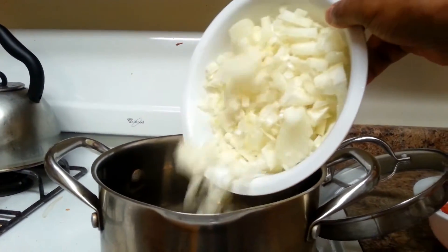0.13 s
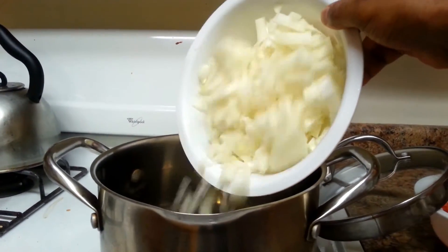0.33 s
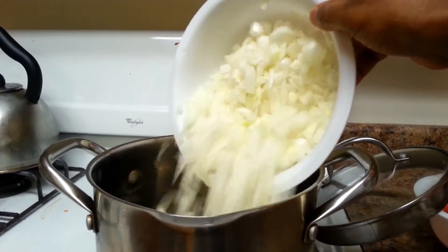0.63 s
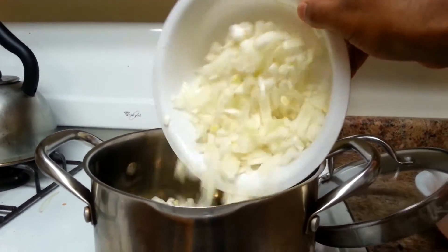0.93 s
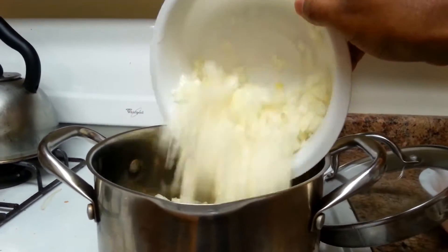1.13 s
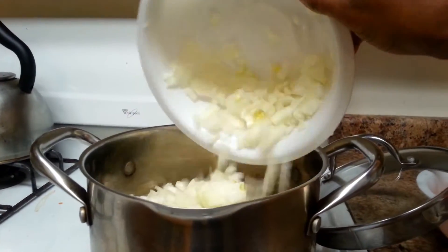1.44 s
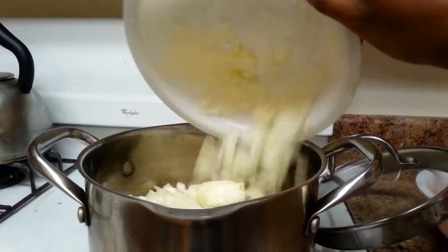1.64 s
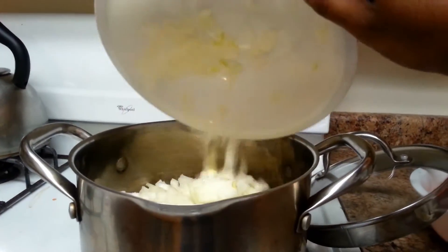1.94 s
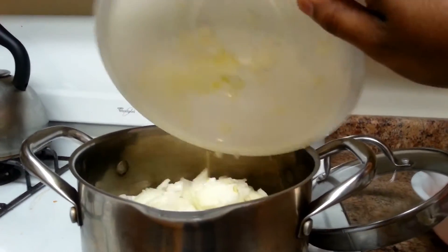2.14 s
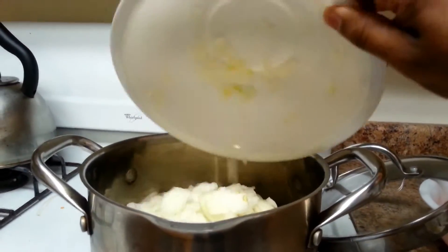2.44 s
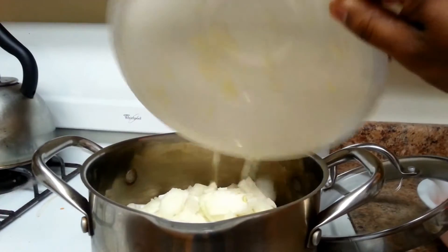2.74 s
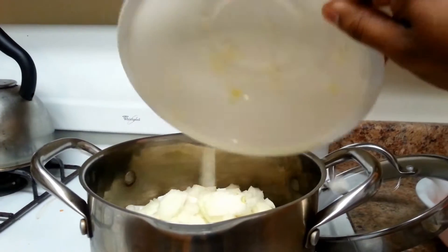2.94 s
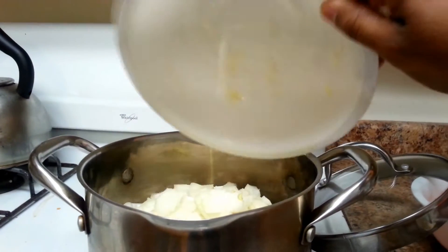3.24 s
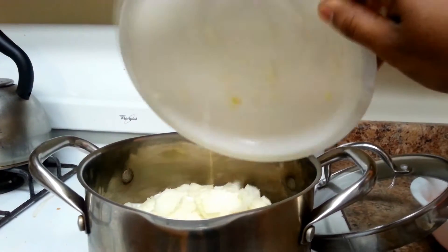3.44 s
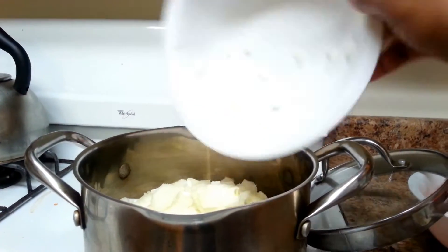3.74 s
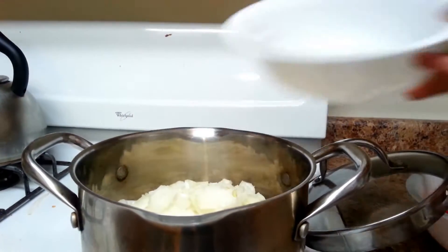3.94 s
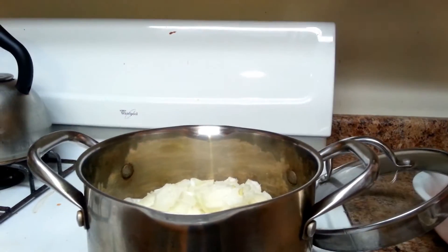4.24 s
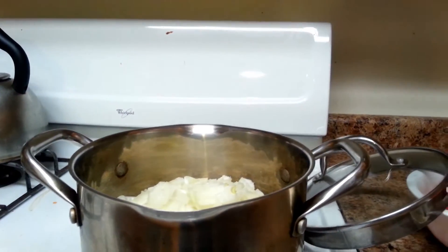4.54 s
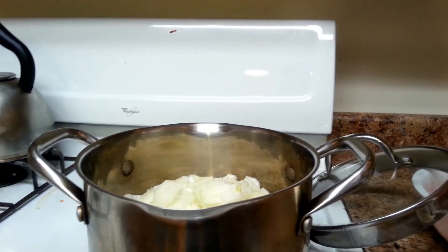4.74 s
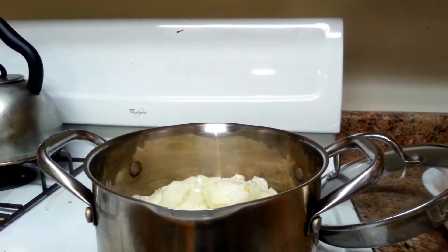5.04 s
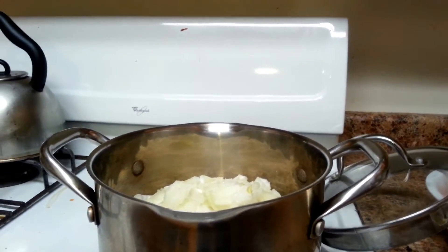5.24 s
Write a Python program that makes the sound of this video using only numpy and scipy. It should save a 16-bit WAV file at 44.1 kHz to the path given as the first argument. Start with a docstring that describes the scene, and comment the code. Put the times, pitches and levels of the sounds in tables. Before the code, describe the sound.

Close in a small, hard-walled kitchen with a steady fan rush, chopped onion drops into a steel pot: damped pats, faint metallic ringing and wet patter, then two soft heaps. The emptied bowl knocks the rim, two weak clinks followed by seven loud, quick ones. After a pause with only the fan, the bowl thumps onto a counter and is nudged.

```python
"""A kitchen stove: chopped onion slides from a bowl into a steel pot; pieces ring the bottom and heaps flop down.
The emptied bowl is knocked against the pot in a run of sharp clinks, then set down on the counter and nudged.
Blows excite decaying modes and noise bursts; sliding food and slips are swarms of tiny random contacts.
A small hard kitchen answers every blow with a dense tail, over the steady rush of a fan made of shaped noise."""
import sys
import numpy as np
from scipy import signal
from scipy.fft import rfft, irfft
from scipy.io import wavfile

SR = 44100
rng = np.random.default_rng(int(sys.argv[2]) if len(sys.argv) > 2 else 0)


def store_wav(level_fs):
    """Save 16-bit WAV to argv[1]."""
    pcm = np.round(np.clip(np.atleast_2d(level_fs), -1, 1) * 32767)
    wavfile.write(sys.argv[1], SR, pcm.T.astype(np.int16))


N = 236891
T = np.arange(N) / SR  # time, s
HZ = np.maximum(np.arange(N + 1) * SR / (2 * N), 1)  # frequencies of a spectrum of 2 N samples


def undb(db):
    """Level to amplitude: 20 dB is a factor of ten."""
    return 10 ** (np.asarray(db) / 20)


def unit(x):
    """Normalization of mean power: scale to rms 1."""
    return x / np.sqrt(np.mean(x ** 2))


def along(points, hz=HZ, axis=1):
    """Interpolation on a log-frequency axis, which follows musical intervals."""
    rows = np.array(points, float)
    return np.interp(np.log(hz), np.log(rows[:, 0]), rows[:, axis])


def pan(db):
    """Interaural level difference: left and right gains, db apart."""
    return undb(np.array([[db], [-db]]) / 2)


def convolve(x, response):
    """Linear superposition: every sample of x starts its own copy of the response."""
    return signal.fftconvolve(np.atleast_2d(x), np.atleast_2d(response), axes=1)[:, :x.shape[-1]]


def colour(x, points, size=2048):
    """Minimum-phase filtering: a causal response of unit energy whose shape follows (pitch_hz, level_db) points."""
    hz = np.maximum(np.arange(size // 2 + 1) * SR / size, 1)
    cepstrum = irfft(np.log(undb(along(points, hz))))
    # folding the cepstrum onto positive times makes the response causal
    cepstrum[1:size // 2] *= 2
    cepstrum[size // 2 + 1:] = 0
    response = irfft(np.exp(rfft(cepstrum)))
    return convolve(x, response / np.linalg.norm(response))


def fade(t60, t):
    """Exponential decay: 60 dB lost in t60 seconds."""
    return np.exp(-np.log(1000) * t / t60)


def swells(rows):
    """Smooth pushes: a sum of Gaussian gains from (peak_s, level_db, half_s) rows."""
    return sum(undb(db) * np.exp(-.5 * ((T - s) / half) ** 2) for s, db, half in rows)


def add(out, s, x):
    """Superposition in time: mix x into out from second s."""
    i = max(int(s * SR), 0)
    out[..., i:i + x.shape[-1]] += x[..., :N - i]


def ring(modes):
    """Modal synthesis: damped sines answer one sharp blow; successive rows swing in opposite directions."""
    t = T[:SR // 2]
    total = 0
    for k, (hz, t60, db, side) in enumerate(modes):
        swing = fade(t60, t) * np.sin(2 * np.pi * hz * t)
        total = total + (-1) ** k * undb(db) * pan(side) * swing
    return total


def vary(modes, spread_db, detune):
    """Modal excitation: each blow meets a slightly different spot and load, which shifts pitch and level."""
    chance = rng.standard_normal((len(modes), 2))
    return [(hz * (1 + detune * a), t60, db + spread_db * b, side)
            for (hz, t60, db, side), (a, b) in zip(modes, chance)]


def crack(points, t60):
    """High modal density: countless short modes merge into a decaying, nearly flat burst, then coloured."""
    shape = fade(t60, T[:SR // 2])
    burst = rng.standard_normal((2, len(shape))) * shape
    for _ in range(2):
        flat = irfft(np.exp(1j * np.angle(rfft(burst))))
        burst = flat * np.sqrt(shape)
    return colour(burst / np.linalg.norm(burst, axis=1, keepdims=True), points)


def grains(rate, spread_db):
    """Shot noise: tiny random contacts, rate a second, with exponentially distributed levels."""
    sizes = undb(spread_db * np.minimum(rng.exponential(size=N), 4))
    return unit((rng.random(N) < rate / SR) * sizes * rng.standard_normal((2, N)))


def diffuse(hz):
    """Diffuse-field coherence: random-phase stereo spectrum, most alike in the bass, unrelated in the treble."""
    # left-right correlation of diffuse sound: pitch_hz, correlation
    correlation = [(30, 0), (80, 1), (300, 0.91), (600, 0.74), (1200, 0), (3000, 0), (14000, 0)]
    likeness = np.clip(along(correlation, hz), 0, .99)
    mid, side = np.exp(2j * np.pi * rng.random((2, len(hz))))
    return mid * np.sqrt(1 + likeness) + side * np.sqrt(1 - likeness) * np.array([[1], [-1]])


def knocks():
    """Impact excitation: a sub-millisecond push wakes bowl and pot; nearly equal spots give related clinks."""
    # bowl against pot: start_s, strength_db, contact_ms (60 dB decay of the push), rim_db (before the rim lift)
    blows = [(1.4774, -21, .16, 3.5), (2.171, -15, 0.25, -5), (2.4388, -3, 0.12, -3.5),
             (2.5994, -1, 0.15, -6), (2.7762, -2, 0.15, -3.5), (2.9374, 0.5, .19, -6),
             (3.1000, 2.5, .2, -8), (3.26, 3.5, 0.19, -4), (3.4558, 3.5, 0.17, -5.5)]
    # bowl and pot rim struck together: pitch_hz, t60_s, level_db, left_minus_right_db
    clink = [(254, 0.041, -35, 2), (636, 0.097, -27.5, 6), (881, 0.076, -17, -9), (974, 0.04, -9.5, 4),
             (1055, 0.044, -17.5, -11), (1246, 0.12, -21, -15), (1323, 0.051, -21, 23),
             (1728, 0.016, -8, 7.5), (1623, 0.028, -28.5, 4), (1693, 0.019, -22.5, -6),
             (2034, 0.11, -23.5, -9), (2170, 0.0088, -24.5, -40), (2386, 0.018, -15.5, 18.5),
             (3160, 0.0057, -5.5, 4), (3590, 0.026, -25.5, 24), (3754, 0.018, -18.5, -12),
             (4190, 0.047, -31, 12), (4595, 0.018, -21, -7), (5380, 0.011, -20, -13),
             (6000, 0.011, -34.5, -22), (7600, 0.036, -42, -3), (7240, 0.044, -28.5, -9),
             (8320, 0.036, -40, -30), (8980, 0.032, -22, -10), (8840, 0.016, -29, -2),
             (10700, 0.0095, -26, -20)]
    # spectrum of the crack: pitch_hz, level_db
    crack_bands = [(60, -34.5), (200, -9), (330, -13.5), (520, -27.5), (740, -6.5), (960, 2), (1150, -2),
                   (1400, -11.5), (1700, -4), (2000, -9), (2600, -7), (4400, -8.5), (5900, -16),
                   (8000, -12), (10000, -14), (14500, -21.5)]
    # spectrum of the rim tick: pitch_hz, level_db
    rim = [(700, 12), (1800, -22.5), (3300, -9), (4400, 13), (6000, -16.5), (9000, -44), (12000, -36)]
    clink_db, crack_db, rim_lift_db = 1, 15.5, 11
    out, same = np.zeros((2, N)), crack(crack_bands, t60=0.048)
    for s, db, contact_ms, rim_db in blows:
        modes = vary(clink, spread_db=1.3, detune=.006)
        snap = pan(-1.6) * (same + crack(crack_bands, t60=0.1)) / np.sqrt(2)
        tick = undb(rim_db + rim_lift_db) * crack(rim, t60=0.019)
        blow = undb(clink_db) * ring(modes) + undb(crack_db) * snap + tick
        push = fade(contact_ms / 1000, T[:SR // 200])
        add(out, s, undb(db) * convolve(blow, push / push.sum()))  # a longer push sounds duller
    return out


def pieces():
    """Soft impact: a piece lands with a damped pat and leaves the bottom ringing, differently at each spot."""
    # the largest single onion pieces: start_s, pat_db, pat_hz
    landings = [(.0405, -14.5, 546), (.0613, -9.5, 652), (.096, -13, 2000), (.1300, -7.5, 974),
                (0.1331, -13, 3920), (.179, -14, 960), (0.217, -22.5, 2720), (.234, -21.5, 3000),
                (.309, -12, 550), (.375, -17, 630), (.4030, -8, 1310), (.4040, -17, 2550),
                (.421, -11.5, 1200), (.4290, -13, 2660), (.487, -23, 1260), (0.5236, -15, 1290),
                (.613, -28, 1540), (0.8464, -17.5, 1210), (0.879, -20, 1610), (1.224, -38, 2760)]
    # pot bottom: pitch_hz, t60_s, level_db, left_minus_right_db
    bottom_modes = [(573, 0.15, -9.5, 3), (940, 0.3, -10, -17), (1030, 0.42, -8.5, 15),
                    (1227, 0.13, -5.5, 2), (2008, 0.35, -10, -9), (2046, 0.25, -11, 6),
                    (2120, 0.18, -17, 11), (3250, 0.3, -18.5, -5), (3500, 0.21, -34, -4),
                    (3768, 0.17, -22, -7), (4500, 0.12, -29, -5), (4420, 0.23, -25, -3),
                    (4980, 0.18, -26, -6), (5900, 0.093, -38, -9)]
    pat_s, shortening = 0.0046, .35  # pat length at 1 kHz; power by which higher pats are shorter
    smack_db, smack_t60_s = 6.5, 0.079
    # bottom ring; softer pieces hardly wake it; the growing pile damps it
    ring_db, soft_hz, cover_db_per_s = -19.5, 920, 23.5
    bits_db, bits_fall_s = -9, 0.12  # crumbs scattering after a piece; time to fall to 1/e
    out, scatter, t = np.zeros((2, N)), np.zeros(N), T[:SR // 20]
    for s, db, hz in landings:
        age = 3 * t / (pat_s / (hz / 1000) ** shortening)
        add(out, s, undb(db) * age ** 2 * np.exp(-1.6 * age) * np.sin(2 * np.pi * hz * t))
        # the softer the piece, the lower its pat and the duller and weaker its smack
        smack_bands = [(hz / 3, -14), (hz, 0), (hz * 1.5, -11), (hz * 4.7, -36), (hz * 9, -70)]
        smack = crack(smack_bands, t60=smack_t60_s)
        add(out, s, undb(db + smack_db) * min(hz / 1800, 1) * smack)
        wake = undb(db + ring_db - cover_db_per_s * s) / (1 + (soft_hz / hz) ** 4)
        modes = vary(bottom_modes, spread_db=2.5, detune=.008)
        add(out, s, wake * ring(modes))
        add(scatter, s, wake * np.exp(-T / bits_fall_s))
    # many tiny bits keep the bottom shimmering, each with a short ring
    bottom = ring(bottom_modes) * fade(0.099, T[:SR // 2])
    bits = grains(rate=300, spread_db=3)
    return out + undb(bits_db) * convolve(scatter * bits[0], bottom / np.linalg.norm(bottom[0]))


def onion():
    """Granular flow: wet dice patter and tick as they slide; a heap lands with a thud and a dying splatter."""
    # heaps of onion landing: start_s, thud_db, splatter_db, fall_s (time to fall to 1/e)
    heaps = [(0.634, -30, -27.5, 0.038), (0.92, -26.5, -31.5, 0.032)]
    # onion sliding out of the bowl in surges: peak_s, level_db, half_s (Gaussian half length)
    surges = [(.23, -45, 0.035), (.535, -38.5, 0.012), (.63, -38, 0.024), (.725, -39.5, 0.029),
              (.90, -41, 0.037), (1.2, -46.5, 0.038), (1.32, -52, .07), (1.69, -51, .04)]
    # spectrum of a heap's thud: pitch_hz, level_db
    thud_bands = [(35, -63), (60, -29), (163, 0), (234, -1), (314, 1.5), (434, -11), (775, -2.5),
                  (911, -24), (1500, -45), (1950, -34), (3300, -120)]
    # spectrum of the wet patter: pitch_hz, level_db
    wet = [(240, -18.5), (400, -9.5), (1020, -6.5), (1160, -7.5), (1690, -15), (1880, -11.5), (4460, -18.5),
           (6040, -26), (13900, -31.5), (15000, -53)]
    # spectrum of crisp ticks of stray dice: pitch_hz, level_db
    tick_bands = [(500, -13), (1200, 0.5), (2000, -4.5), (2800, -2), (4200, -8.5), (6000, -21),
                  (14000, -32)]
    # thin patter between the surges, until the bowl runs empty
    trickle_db, trickle_end_s, trickle_fall_s = -49.5, 0.92, 0.33
    tick_db, ticks_per_s = -9.5, 180  # level relative to the patter
    trickle = undb(trickle_db) * np.exp(-np.maximum(T - trickle_end_s, 0) / trickle_fall_s)
    thud, splatter = np.zeros(N), trickle + swells(surges)
    for s, thud_db, splatter_db, fall in heaps:
        landing = (1 - fade(0.0049, T)) * np.exp(-T / fall)
        add(thud, s, undb(thud_db) * landing)
        add(splatter, s, undb(splatter_db) * landing)
    patter = colour(splatter * grains(rate=2500, spread_db=-0.5), wet)
    ticks = undb(tick_db) * colour(splatter * grains(rate=ticks_per_s, spread_db=1), tick_bands)
    thuds = colour(thud * grains(rate=3300, spread_db=6.0)[0], thud_bands)
    return thuds + pan(-0.45) * patter + ticks


def brush(s=1.785, db=-45):
    """Friction noise: a brief light scrape of dense contacts as the last pieces leave the bowl."""
    swell = np.exp(-.5 * ((T - s) / .016) ** 2)
    contacts = grains(rate=3000, spread_db=1.5)
    # pitch_hz, level_db
    scrape = [(2200, -19), (2800, -3), (3600, -8), (5500, -7), (6800, -10), (8500, -21), (12000, -38)]
    return undb(db) * colour(swell * contacts, scrape)


def counter():
    """Impact and friction: the bowl thumps down with an early echo, bumps again and is nudged in small slips."""
    # bowl set down, its early echo at 4.9234 s, and later bumps on the counter: start_s, level_db
    setdown = [(4.9098, 2), (4.9234, -10), (4.9673, -6), (5.1970, -11.5), (5.2300, -9.5)]
    # bowl standing on the counter: pitch_hz, t60_s, level_db, left_minus_right_db
    bowl_modes = [(122, .15, -56, 8), (203.6, 0.19, -37.5, 7), (459, 0.084, -34.5, 2),
                  (680, 0.024, -31.5, 7), (925, 0.051, -24.5, -11), (1630, 0.069, -26.5, 14),
                  (2177, 0.026, -23, 14), (2440, 0.023, -20, 6), (3420, 0.0088, -32.5, 18)]
    # spectrum of bowl base against counter: pitch_hz, level_db
    scuff = [(40, -33), (75, 4), (115, 3), (200, -4.5), (350, -13), (450, -26), (740, -10.5), (920, -4.5),
             (1220, -6.5), (1650, -4.5), (2400, -8), (4500, -23.5), (7000, -40), (12000, -55)]
    # low thump of the counter top under the bowl: pitch_hz, level_db
    thump = [(30, -29), (60, -9), (110, -0.5), (150, -7), (250, -27), (600, -62)]
    # bowl base pushed along the counter: peak_s, level_db, half_s (Gaussian half length)
    nudges = [(4.99, -34, 0.021), (5.2, -33.5, 0.022), (5.255, -33, 0.021)]
    scuff_db, thump_db, thump_t60_s = 3.5, -5, 0.11
    blows = np.zeros(N)
    for s, db in setdown:
        add(blows, s, undb([db]))
    body = ring(bowl_modes) + undb(scuff_db) * crack(scuff, t60=0.043)
    body = body + undb(thump_db) * crack(thump, t60=thump_t60_s)[0]
    slips = swells(nudges) * grains(rate=500, spread_db=2.5)
    return convolve(blows, body) + colour(slips, scuff)


def ports(x, hz=450):
    """Radiation and spacing: small objects hardly radiate long waves, which reach both microphone ports alike."""
    low_cut_hz = 98
    x = signal.sosfilt(signal.butter(3, low_cut_hz, "high", fs=SR, output="sos"), x)
    mid, side = (x[0] + x[1]) / 2, (x[0] - x[1]) / 2
    # the left-right difference shrinks towards a fifth in the bass
    spectrum = rfft(side, 2 * N) * np.sqrt((HZ ** 2 + (hz / 5) ** 2) / (HZ ** 2 + hz ** 2))
    return mid + irfft(spectrum)[:N] * np.array([[1], [-1]])


def kitchen(x, first_s=0.00465, build_s=0.004, db=-2, ceiling_s=0.016, ceiling=0.44):
    """Reverberation: stove back and walls return a dense tail, swelled by the ceiling; the lows linger longest."""
    # kitchen bands: pitch_hz, t60_s, level_db
    bands = [(103, 0.59, 1), (294, 0.68, 7.5), (653, 0.68, 9), (892, 0.36, -1), (2000, 0.39, -1.5),
             (3800, 0.36, 0), (8000, 0.25, 1.5), (14200, .24, -11)]
    t, hz = T[:SR], np.maximum(np.arange(SR // 2 + 1), 1)
    noise, tail = diffuse(hz), 0
    centres = np.log(np.array(bands)[:, 0])
    build_up = 1 - fade(build_s, np.maximum(t - first_s, 0))
    arrival = build_up * (1 + ceiling * np.exp(-((t - ceiling_s) / 0.016) ** 2))
    for (_, t60, band_db), share in zip(bands, np.eye(len(bands))):
        band = irfft(noise * np.interp(np.log(hz), centres, share))  # overlapping triangular bands
        tail = tail + undb(band_db) * unit(arrival * fade(t60, t)) * band / np.sqrt(2)
    return undb(db) * convolve(x, tail)


def fan():
    """Flow noise and duct resonance: a steady broadband rush of air with humps and dips in its spectrum."""
    # rush of air: pitch_hz, level_db
    rush = [(25, -14), (45, -25), (65, -25.5), (88, -18), (110, -8.5), (150, -16), (200, -7.5), (350, -4.5),
            (540, -6), (900, -13.5), (1800, -22.5), (4000, -26.5), (7000, -25.5), (14500, -31.5)]
    # duct resonances: pitch_hz, width_hz, gain_db over the rush
    duct = [(117, 13, 5), (141, 16, -21), (201, 37, 6), (340, 25, 9), (546.4, 16, 10.5), (2880, 130, 4.5),
            (4630, 770, 6), (6400, 2500, -6)]
    fan_db = -42.5
    db = along(rush) + sum(gain_db / (1 + (2 * (HZ - hz) / width) ** 2) for hz, width, gain_db in duct)
    treble_right = pan(-2.2) ** np.clip(HZ / 4000, 0, 1)  # leans right towards the treble
    return undb(fan_db) * unit(irfft(diffuse(HZ) * undb(db) * treble_right)[:, :N])


def scene():
    """Direct plus reverberant field: all sources share one kitchen; the pot walls shield the onion from it."""
    bowl = ports(knocks() + pan(0.8) * counter())
    food = ports(pieces() + onion() + brush())
    return bowl + food + kitchen(bowl + undb(-4) * food) + fan()


def record(dry):
    """Saturation and band limits: the microphone rounds the loudest peaks and cuts the rumble and the top."""
    top_hz = 14900
    rounded = dry / (1 + dry ** 4) ** (1 / 4)
    lean = signal.sosfilt(signal.butter(2, 45, "high", fs=SR, output="sos"), rounded)
    return signal.sosfilt(signal.ellip(8, .2, 70, top_hz, fs=SR, output="sos"), lean)


dry = scene()
out = record(dry)
store_wav(out)
```